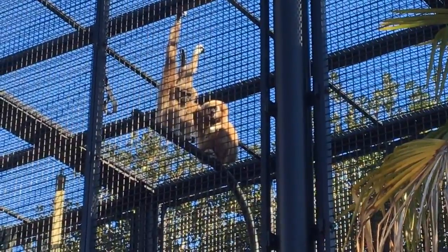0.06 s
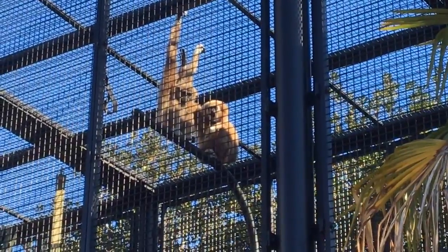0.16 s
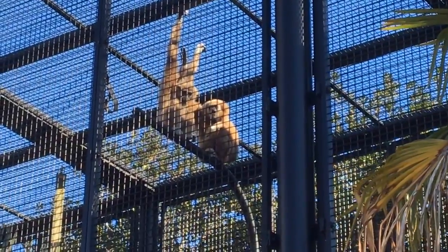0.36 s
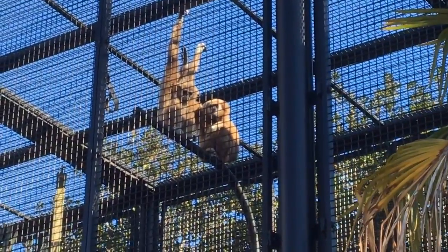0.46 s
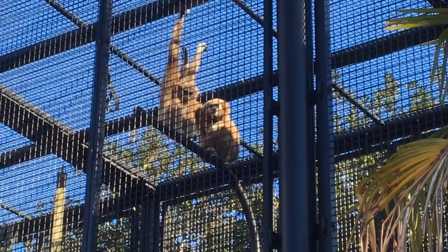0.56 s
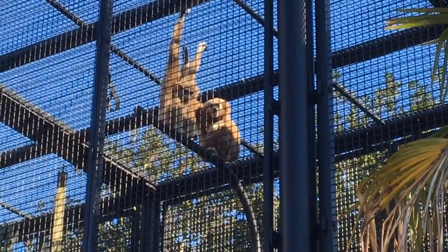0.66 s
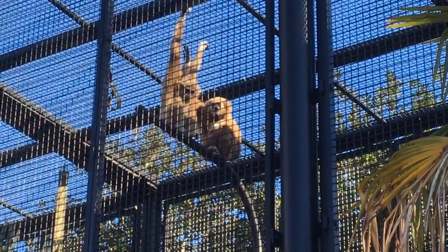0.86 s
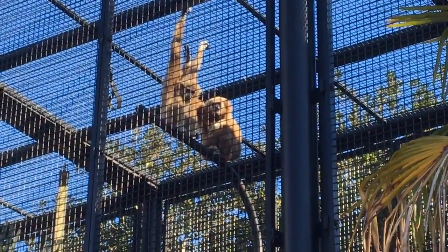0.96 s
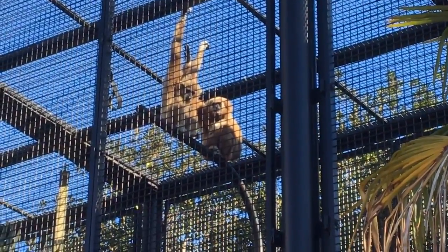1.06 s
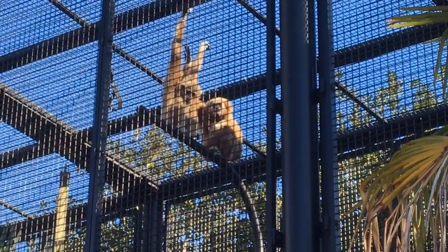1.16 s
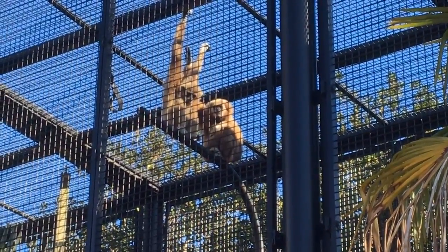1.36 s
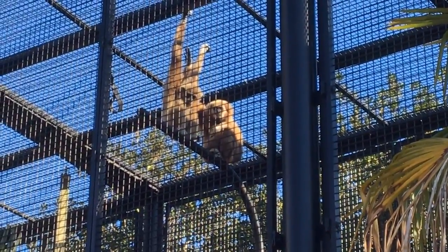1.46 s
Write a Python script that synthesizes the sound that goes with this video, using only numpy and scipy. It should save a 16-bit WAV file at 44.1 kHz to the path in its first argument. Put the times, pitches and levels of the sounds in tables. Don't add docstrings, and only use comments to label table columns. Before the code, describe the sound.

A gibbon gives one loud, clear rising whoop, then a weaker one, echoing outdoors in its cage

```python
import sys
import numpy as np
from scipy import signal
from scipy.fft import rfft, irfft
from scipy.io import wavfile
from scipy.ndimage import uniform_filter1d

SR = 44100
rng = np.random.default_rng(int(sys.argv[2]) if len(sys.argv) > 2 else 0)


def inscribe(sig):
    pcm = np.round(np.clip(np.atleast_2d(sig).T, -1, 1) * 32767)
    wavfile.write(sys.argv[1], SR, pcm.astype(np.int16))


def gain_from_db(level_db):
    decades = np.asarray(level_db, float) / 20
    return 10 ** decades


N = 66150
T = np.arange(N) / SR
F = np.maximum(np.arange(N // 2 + 1) * SR / N, 1)


def unit(x):
    return x / np.sqrt(np.mean(x ** 2))


def colour(x, db):
    return irfft(rfft(x) * gain_from_db(db), N)


def bell(f, hz, width_hz):
    return np.exp(-.5 * ((f - hz) / width_hz * 2) ** 2)


def band(x, hz, width_hz):
    return irfft(rfft(x) * bell(F, hz, width_hz), N)


def octave_band(spectrum, hz):
    return irfft(spectrum * np.clip(1 - np.abs(np.log2(F / hz)), 0, 1), N)


def walk(rate_hz):
    return unit(band(rng.standard_normal(N), 0, rate_hz))


def tone(hz):
    return np.sqrt(2) * np.sin(2 * np.pi * np.cumsum(hz) / SR)


def breath_noise():
    air_db = -3 * np.log2(F / 1000).clip(0) - 40 * (F < 900)
    return unit(colour(rng.standard_normal(N), air_db))


def gibbon():
    # t/s, pitch/Hz, level/dB, overtones/dB, mouth resonance/Hz
    whoops = [
        [(.172, 544, -42.5, -33, 1650), (.19, 541, -25, -27.5, 1760), (.232, 685, -22, -26, 1710),
         (.256, 865.8, -23.5, -9.5, 2200), (.278, 1029, -15, -18.5, 1970), (.298, 1188, -14, -17.5, 2130),
         (.327, 1239, -21.5, -7, 2450), (.346, 1210, -19, -13, 2400), (.362, 1120, -32, -11, 2750)],
        [(.602, 488.6, -43.5, -38, 1202), (.618, 484.2, -34, -22.5, 1210), (.645, 494.9, -23.5, -29.5, 1150),
         (.662, 541.2, -28.5, -20, 1123), (.68, 594.5, -26, -19, 1230), (.702, 645.2, -18.5, -27.5, 1340),
         (.72, 735, -27.5, -13.5, 1440), (.738, 757, -41.5, -9, 1510)],
    ]
    # f/Hz, width/Hz, gain/dB
    throat = [(1150, 630, 1.5), (1343, 160, -2), (2815, 416, -41), (3975, 420, 9.5), (4890, 200, 5.5),
              (611, 54, -4.5), (6420, 550, 5.5), (7870, 250, 7.5), (8240, 1450, -9), (9170, 1200, -3.5),
              (10640, 810, -9), (12600, 2100, -4), (893, 26, -9), (16740, 5950, -15)]
    mouth_lifts_db, ring_lifts_db = [18, 2.5], [9, -4]
    taut_hz = 1070
    slack_wobble, taut_wobble = .075, .012
    edge_s = .008
    out = np.zeros(N)
    for rows, mouth_db, ring_db in zip(whoops, mouth_lifts_db, ring_lifts_db):
        s, *controls = np.array(rows, float).T
        hz, db, over_db, mouth_hz = (uniform_filter1d(np.interp(T, s, v), size=600) for v in controls)
        taut = np.clip((hz - taut_hz) / 100, 0, 1)
        phase = 2 * np.pi * np.cumsum(hz * (1 + .0015 * walk(110))) / SR
        voice = np.sqrt(2) * np.sin(phase)
        phase = phase + (slack_wobble + (taut_wobble - slack_wobble) * taut) * walk(600)
        for k in range(2, 32):
            lift_db = mouth_db * bell(k * hz, mouth_hz, 478)
            lift_db += ring_db * bell(k * hz, 4056, 280)
            slope_db = -6 * np.log2(k / 2) - 22 * taut * max(np.log2(k / 6), 0)
            shimmer_db = 1.5 * walk(80)
            patch_db = 5 * min(k / 10, 1) * (1 - taut / 2) * walk(30)
            level_db = over_db + lift_db + slope_db + shimmer_db + patch_db
            voice = voice + np.sin(k * phase) * gain_from_db(level_db) * (k * hz < SR / 2.2)
        voice = voice + gain_from_db(-15 + over_db - 10 * taut) * breath_noise() * (1 + np.cos(phase))
        gate = np.clip(np.minimum(T - s[0], s[-1] + edge_s - T) / edge_s, 0, 1)
        out += voice * gate * gain_from_db(db)
    return colour(out, sum(db * bell(F, hz, width_hz) for hz, width_hz, db in throat))


def space(x):
    # delay t/s, level/dB
    echoes = [(.0065, -21.5), (.0135, -13), (.021, -20), (.034, -46), (.052, -19), (.068, -19)]
    # level/dB, low t60/s, high t60/s, start t/s
    tails = [(-11.5, 0.35, 0.42, 0.005), (-22.5, 1.49, 1, 0.054), (-34, 0.66, 0.53, 0.33)]
    reflected = sum(gain_from_db(db) * np.exp(-2j * np.pi * F * s) for s, db in echoes)
    for db, low_s, high_s, start_s in tails:
        noise = rfft(rng.standard_normal(N))
        tail = 0
        for octave in range(8):
            t60 = low_s + (high_s - low_s) * np.clip((octave - 2) / 3, 0, 1)
            tail = tail + octave_band(noise, 200 * 2 ** octave) * gain_from_db(-60 * T / t60)
        tail = tail * np.clip(T / start_s - .5, 0, 1) * np.clip((1 - T) * 10, 0, 1)
        reflected = reflected + gain_from_db(db) * rfft(tail / np.sqrt(np.sum(tail ** 2)))
    wall_db = -2 * np.log2(F / 2500).clip(0) - 6 * (F > 3000)
    return signal.fftconvolve(x, irfft(1 + reflected * gain_from_db(wall_db), N))[:N]


def ticks():
    # t/s, level/dB, ring share/dB
    knocks = [
        (.3105, -39, -2),
        (.357, -46, 7),
        (.4385, -39, 3),
    ]
    out = np.zeros(N)
    for s, db, ring_db in knocks:
        burst = rng.standard_normal(N) * np.exp(-np.abs(T - s) / .0005) * (T > s - .0002)
        ring = gain_from_db(ring_db) * 2 * band(burst, 8700, 1300)
        snap = band(burst, 13800, 5000)
        out += gain_from_db(db) * (ring + snap)
    return out


def whistle():
    # t/s, f/Hz, level/dB
    glide = [(0, 5800, -73), (.03, 5850, -75), (.06, 6250, -78), (.085, 6980, -75), (.105, 7000, -79),
             (.125, 8000, -81), (.15, 8400, -83), (.175, 8200, -95)]
    s, hz, db = np.array(glide).T
    return tone(np.interp(T, s, hz)) * gain_from_db(np.interp(T, s, db, right=-150) + 4 * walk(60) - 3)


def chirps():
    # start t/s, length/s, base f/Hz, rise/Hz, level/dB
    calls = [
        (.0, .05, 3300, 100, -71),
        (.04, .05, 3500, 150, -72),
        (.112, .055, 3650, 100, -70),
        (.85, .05, 3500, 300, -73),
        (1.11, .052, 3350, 600, -63),
        (1.25, .05, 3400, 380, -66),
    ]
    out = np.zeros(N)
    for s, length, hz, rise_hz, db in calls:
        u = np.clip((T - s) / length, 0, 1)
        arch = np.exp(-((u - .42) / .27) ** 2)
        pitch = (hz + rise_hz * arch) * (1 + .012 * walk(200))
        upper = gain_from_db(-1.5) * tone(1.16 * pitch) * (u < .8)
        out += gain_from_db(db) * np.sin(np.pi * u) ** 0.48 * (tone(pitch) + upper)
    return out


def machinery():
    # f/Hz, width/Hz, level/dB
    hums = [(33, 42, -60), (62.3, 11.2, -47.5), (86, 42, -49.5), (127.2, 32, -49)]
    # t/s, level/dB
    swell = [(0, 3.5), (.2, 2), (.45, -3), (.62, 2.5), (.8, -0.5), (1, 4), (1.3, 3), (1.39, 1),
             (1.41, -10.5), (1.5, 3.5)]
    hum = sum(gain_from_db(db) * unit(band(rng.standard_normal(N), hz, width_hz)) for hz, width_hz, db in hums)
    return hum * gain_from_db(np.interp(T, *np.array(swell).T))


def town():
    # f/Hz, density level/dB
    spectrum = [(200, 3), (330, -3), (700, -2.5), (1200, -1.5), (1900, -7), (2800, -18), (3900, -21.5),
                (5000, -30), (16900, -36.5)]
    hz, db = np.array(spectrum).T
    shape_db = np.interp(np.log(np.maximum(F, 200)), np.log(hz), db) - 12 * np.log2(200 / F).clip(0)
    noise = rfft(colour(rng.standard_normal(N), shape_db))
    air = sum(octave_band(noise, 50 * 2 ** k) * gain_from_db(.8 * walk(25.4)) for k in range(10))
    return gain_from_db(-50.5) * unit(air)


def scene():
    return (space(gibbon() + whistle() + chirps()) + ticks() + machinery() + town())[None]


def low_pass(x):
    return signal.sosfilt(signal.butter(12, 17090, fs=SR, output="sos"), x)


def record(dry):
    return low_pass(dry)


dry = scene()
out = record(dry)
inscribe(out)
```